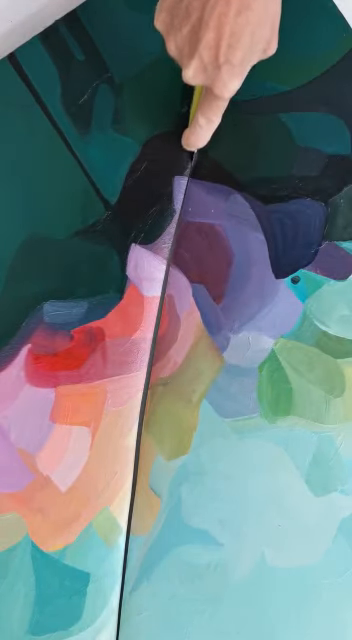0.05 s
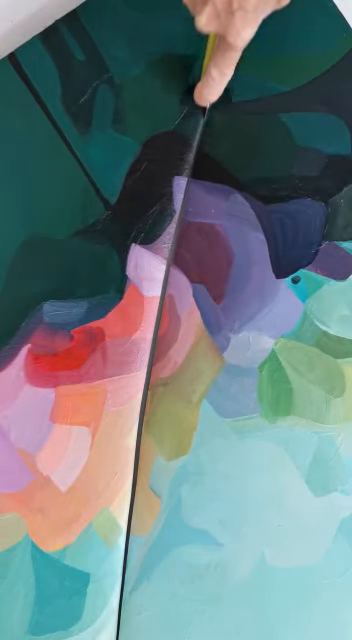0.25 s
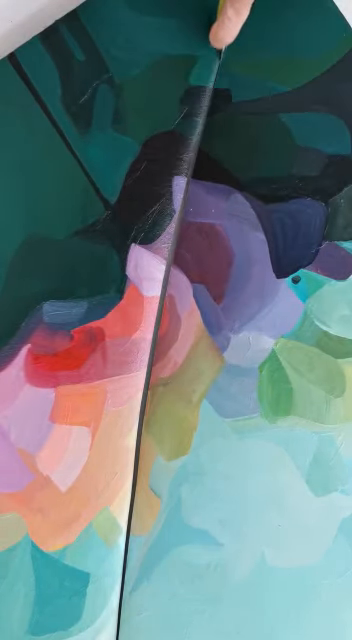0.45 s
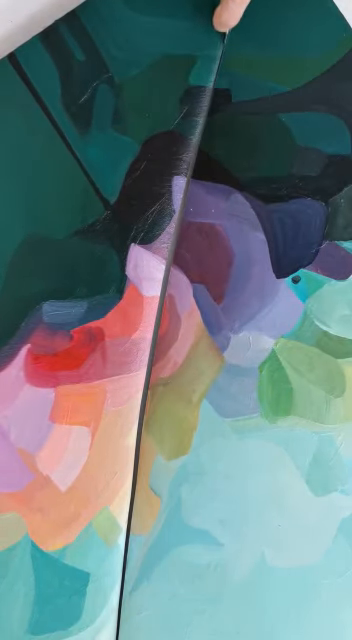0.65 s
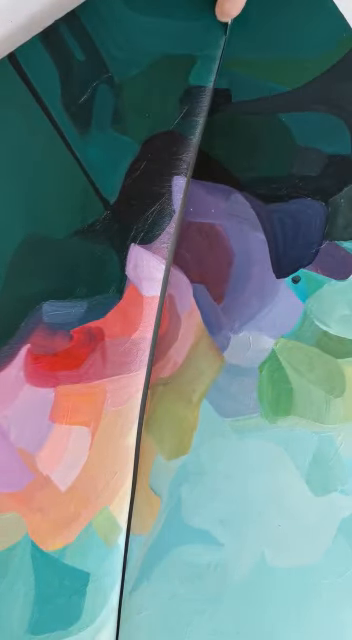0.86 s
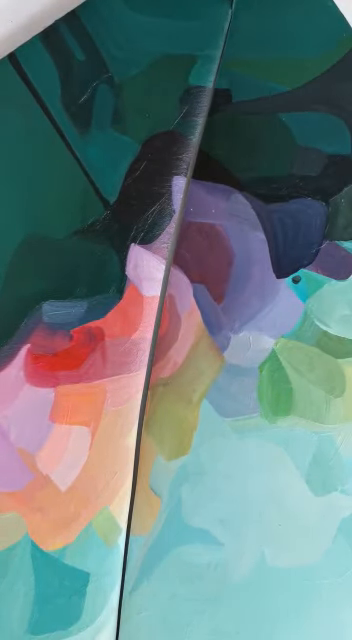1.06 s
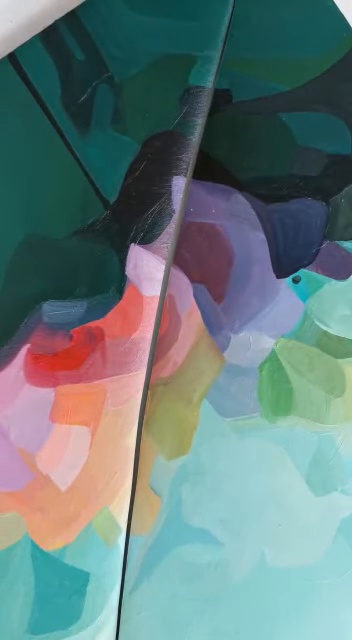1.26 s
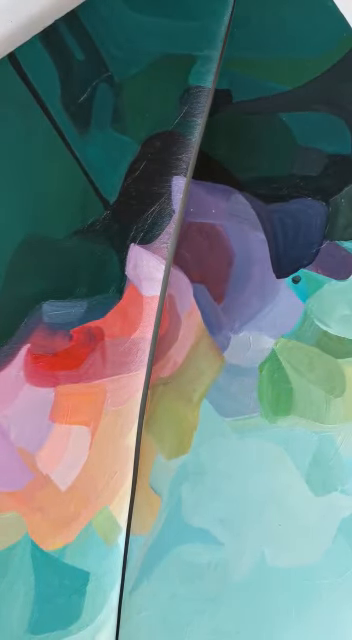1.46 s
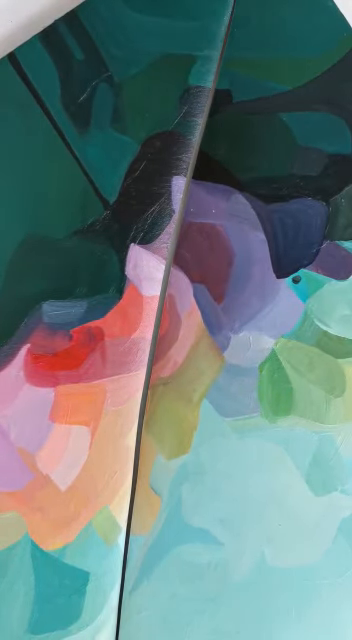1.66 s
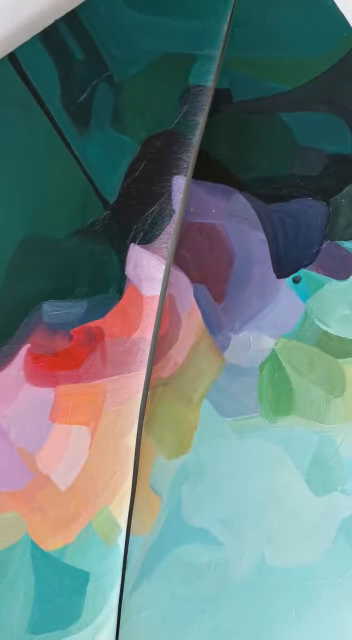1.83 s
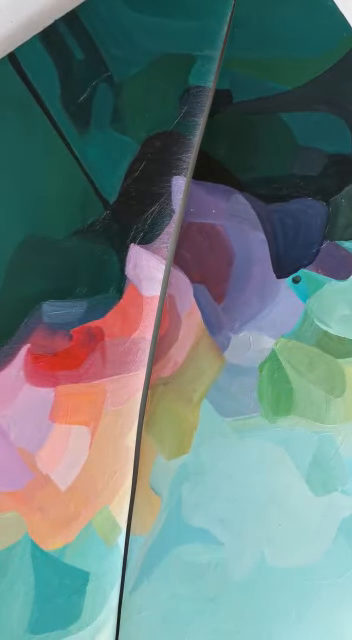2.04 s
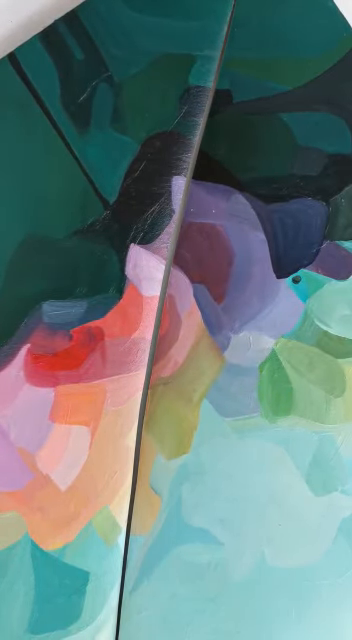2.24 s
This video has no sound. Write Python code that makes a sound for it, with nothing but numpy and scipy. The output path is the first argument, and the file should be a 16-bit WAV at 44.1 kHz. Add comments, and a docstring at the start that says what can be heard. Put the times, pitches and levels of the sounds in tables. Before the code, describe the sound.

A knife rasps through stretched canvas in a quiet, slightly echoing room. The first pull swells from 0.3 to 0.6 seconds, crackling and groaning over drum-like cloth. Threads snag and pop, then a second pull peaks near 1.2 and stops by 1.7. The loose canvas flaps softly. Around 2 seconds the blade rubs, knocks the wooden frame and clicks free. Close handling ticks fall at 1.8 and 2.3.

```python
"""In a quiet, slightly echoing room, a craft knife is pulled twice through a stretched canvas.
A low room hum fades at the start. Each thread that parts plucks the tight cloth like a drum and gives
off a tiny crackle. Tough threads catch and tear, the sticking blade makes the cloth groan, and later
the loose canvas flaps. At the end the blade rubs, knocks against the wooden frame and clicks free,
with two small handling ticks close by."""
import sys
import numpy as np
from scipy import signal
from scipy.fft import rfft, irfft, next_fast_len
from scipy.io import wavfile
from scipy.ndimage import map_coordinates

SR = 44100
rng = np.random.default_rng(int(sys.argv[2]) if len(sys.argv) > 2 else 0)


def wav_out(sig):
    """Save sig, one row per channel (or a flat mono array), as 16-bit PCM at SR to the path in sys.argv[1]."""
    wavfile.write(sys.argv[1], SR, np.round(np.clip(np.atleast_2d(sig).T, -1, 1) * 32767).astype(np.int16))


N = 101429
T = np.arange(N) / SR
M = next_fast_len(N + SR // 2)  # extra samples leave space for ringing
HZ = np.fft.rfftfreq(M, 1 / SR)

# tough threads that catch and tear: start_s, pluck_db, crackle_db
SNAGS = [(0.012, -36.5, -51.5), (0.074, -53, -48.5), (0.602, -29, -52), (0.7658, -33.5, -49),
         (0.7936, -41.5, -51.5), (0.865, -56, -54), (0.9044, -41.5, -54), (0.9233, -48, -49.5),
         (0.9565, -38, -50), (0.991, -38, -52), (1.0396, -35.5, -46.5), (1.057, -44, -50),
         (1.076, -29.5, -75), (1.105, -36, -61), (1.125, -26, -45.5)]


def amp(db):
    """Turn decibels into a gain."""
    return 10 ** (np.asarray(db) / 20)


def unit(x):
    """Scale to an average power of 1."""
    return x / np.sqrt(np.mean(x ** 2) + 1e-20)


def along(points, hz=HZ):
    """Join (pitch_hz, value) points on a log frequency axis."""
    pitches, values = np.transpose(points)
    return np.interp(np.log(hz + 1), np.log(pitches + 1), values)


def curves(rows):
    """One smooth line through time for each column after the first."""
    times, *columns = np.transpose(rows)
    return [np.interp(T, times, column) for column in columns]


def filtered(x, response):
    """Pass x through a filter given as one gain per frequency."""
    return irfft(rfft(x, M) * response, M)[..., :N]


def colour(points):
    """A tone filter through (pitch_hz, level_db) points that keeps the power of white noise."""
    cepstrum = irfft(np.log(unit(amp(along(points)))), M)
    # folded so that the filter rings only after a hit
    cepstrum[1:M // 2] *= 2
    cepstrum[M // 2 + 1:] = 0
    return np.exp(rfft(cepstrum))


def body(modes, low_hz=110, high_hz=1071):
    """An object's fading resonances, weak in deep bass and treble; a tap of 1 peaks at 1."""
    ring = sum(amp(db) * 1j * HZ * width / (hz * hz - HZ * HZ + 1j * HZ * width)
               for hz, width, db in modes)
    low, high = 1j * HZ / low_hz, 1j * HZ / high_hz
    ring = ring * low ** 2 / (1 + low + low ** 2) / (1 + high + high ** 2) ** 2
    return ring / np.abs(irfft(ring, M)).max()


def taps(times, sizes):
    """One-sample taps at the given times."""
    return np.bincount(np.clip(np.asarray(times) * SR, 0, N).astype(int), sizes, N + 1)[:N]


def burst(s, db, decay_s):
    """Noise that starts at time s and dies away."""
    return amp(db) / 2 * (T >= s) * np.exp(-np.abs(T - s) / decay_s) * rng.standard_normal(N)


def swell(s, width_s):
    """A smooth rise and fall around time s."""
    return np.exp(-.5 * ((T - s) / width_s) ** 2)


def panned(x, pan_db):
    """Make the left side pan_db louder than the right."""
    gains = amp(np.array([[.5], [-.5]]) * pan_db)
    return filtered(x, gains / gains.mean(axis=0))


def diffuse(pair):
    """Sound from all around: left and right agree most in the bass."""
    # how alike the sides are: pitch_hz, likeness (1 = the same)
    alike = [(30, 0.22), (130, 1), (300, 0.84), (1300, 0.11)]
    turn = np.arccos(np.clip(along(alike), -1, 1)) / 2
    mid, side = filtered(pair, np.array([np.cos(turn), np.sin(turn)]))
    return np.array([mid + side, mid - side])


def room_tone(level_db=-57, sway_db=4):
    """A faint indoor rumble whose level slowly sways."""
    # tone of the rumble: pitch_hz, level_db
    rumble_tone = [(20, 4.5), (45, -14), (64, 1.5), (130, -13.5), (250, -24), (700, -24), (2000, -33),
                   (16000, -50)]
    sway = map_coordinates(rng.standard_normal(size=40), [T * 6], mode="mirror")
    rumble = filtered(diffuse(rng.standard_normal((2, N))), amp(along(rumble_tone)))
    return amp(level_db + sway_db * sway) * unit(rumble)


def room(x, places=12, walls_decay_s=0.0016, walls_db=3, walls_low_hz=1660, left_lead_s=0.00024):
    """Sound arrives on the left first; near echoes shift as the blade travels, and a tail follows."""
    # time the tail takes to fade by 60 dB: pitch_hz, fade_s
    fade_times = [(350, 0.37), (900, 0.53), (5000, 0.7), (15000, 0.2)]
    # tone of the tail: pitch_hz, level_db
    tail_tone = [(100, -2.5), (400, -7.5), (1000, -7.5), (15000, -1.5)]
    hz, t, noise = signal.stft(rng.standard_normal((2, N)), SR, nperseg=256)
    fading = noise * amp(-60 * t / along(fade_times, hz)[:, None])
    tail = signal.istft(fading, SR, nperseg=256)[1][:, :N] * (T > .004)
    tail = filtered(unit(tail) / np.sqrt(N), amp(along(tail_tone)))
    echoes = 0
    for place in np.eye(places):
        walls = rfft(rng.standard_normal((2, N)) * np.exp(-T / walls_decay_s), M)
        share = np.interp(T, np.linspace(0, T[-1], places), place)
        echoes = echoes + filtered(x * np.sqrt(share), walls / np.abs(walls))
    echoes = filtered(echoes, amp(walls_db) * HZ / np.hypot(HZ, walls_low_hz))
    direct = np.exp(1j * np.pi * HZ * left_lead_s * np.array([[1], [-1]]))
    return filtered(x, direct + rfft(diffuse(tail), M)) + echoes


def hum_and_flaps(rise_s=0.0025):
    """A low room hum fades at the start; later the loose canvas swings with three low thumps."""
    # the hum, then the three thumps: start_s, pitch_hz, level_db, decay_s
    low_tones = [(0.0, 64.6, -47.5, 0.11), (1.43, 143, -46, 0.034), (1.617, 144, -39, 0.019),
                 (1.94, 135.5, -38.5, 0.055)]
    out = 0
    for s, hz, db, decay_s in low_tones:
        age = np.maximum(T - s, 0)
        level = amp(db) * (1 - np.exp(-age / rise_s)) * np.exp(-age / decay_s)
        out = out + level * np.sin(2 * np.pi * hz * age)
    return out


def ticks():
    """Handling makes small, sharp ticks close by."""
    # the ticks: start_s, level_db
    hits = [(1.7954, -22.5), (2.276, -33)]
    # their tone: pitch_hz, level_db
    tick_tone = [(900, -27), (1600, -9.5), (2600, 2), (3500, -8), (15000, -40)]
    return filtered(sum(taps([s], [amp(db)]) for s, db in hits), colour(tick_tone))


def sticking_blade(groan_width_cycles=2.04):
    """The blade grips, so the cloth groans; as it scrapes, the blade itself rings thinly."""
    # cloth groans: peak_s, pitch_hz, level_db
    groans = [(0.292, 437, -29.5), (0.315, 472, -25.5), (0.340, 453, -28), (0.356, 592, -32),
              (0.387, 388, -27), (0.446, 224, -30), (0.536, 220, -32.5), (0.561, 174.6, -37.5)]
    # blade rings: peak_s, half_length_s, pitch_hz, glide_hz_per_s, width_hz, level_db
    rings = [(0.31, 0.08, 2222, 6, 60, -66), (0.37, 0.08, 4875, 4500, 700, -57),
             (0.44, 0.037, 8370, -5.5, 300, -65), (1.41, 0.08, 7290, 1.5, 1000, -56.5)]
    out = sum(amp(db) * swell(s, groan_width_cycles / hz) * np.sin(2 * np.pi * hz * (T - s))
              for s, hz, db in groans)
    for s, width_s, hz, glide, width_hz, db in rings:
        flutter = filtered(rng.standard_normal(N), 1 / (1 + (HZ / width_hz) ** 2))
        tone = np.sin(2 * np.pi * np.cumsum(hz + glide * (T - s)) / SR)
        out = out + amp(db) * swell(s, width_s) * unit(flutter * tone)
    return out


def knife_at_frame():
    """The blade rubs at the end of the slit, knocks the wooden frame and clicks free."""
    # hits on the frame: start_s, knock_db, click_db
    hits = [(1.929, -50, -39.5), (1.937, -35.5, -36), (1.9745, -17.5, -28.5), (2.0055, -28.5, -36),
            (2.0081, -34, -19), (2.0143, -61, -30), (2.023, -57, -31.5), (2.0357, -53, -27)]
    # the frame's resonances: pitch_hz, width_hz, level_db
    wood = [(131, 75, -3.5), (184, 15, -2.5), (414, 470, -7.5), (638, 34, 3.5), (760, 73, -5),
            (1400, 520, -5.5)]
    # loudness of the rubbing: time_s, level_db
    rub_levels = [(1.78, -68.5), (1.83, -58), (1.875, -49.5), (1.9, -55.5), (1.97, -52.5), (1.985, -42),
                  (2.02, -51.5), (2.12, -53.5), (2.25, -92)]
    # tone of the clicks and of the rubbing: pitch_hz, level_db
    click_tone = [(500, -2.5), (3000, -8.5), (7000, -1.5), (10800, -7), (16000, -16.5)]
    rub_tone = [(100, 3), (400, -12), (650, 0.5), (1150, -4.5), (2200, -13.5), (7000, -21.5), (16000, -35)]
    knocks = filtered(sum(taps([s], [amp(db)]) for s, db, _ in hits), body(wood))
    clicks = filtered(sum(burst(s, db, decay_s=0.0016) for s, _, db in hits), colour(click_tone))
    rub = amp(curves(rub_levels)[0]) * unit(filtered(rng.standard_normal(N), colour(rub_tone)))
    return panned(clicks + knocks + rub, pan_db=-2.5)


def cloth_drum(plucks, level, stage, scrape=0.76):
    """Plucks, snags and a steady scrape make the tight cloth ring like a drum."""
    # the cloth's resonances at stages 0, 1 and 2: pitch_hz, width_hz, level_db
    first_pull = [(231, 40, 5.5), (310, 87, 5.5), (424, 82, 7.5), (570, 89, 0), (1110, 240, -8)]
    light_blade = [(187, 150, -5.5), (635, 122, 2), (790, 59, -9.5), (1080, 57, -5.5), (1314, 480, -2.5)]
    second_pull = [(166, 150, 2), (318, 210, -2), (442, 140, 0), (585, 54, 4), (740, 40, -28),
                   (1170, 100, -20)]
    shaking = plucks + scrape * rng.standard_normal(N)
    snags = sum(taps([s], [amp(db)]) for s, db, _ in SNAGS)
    drum = 0
    for k, modes in enumerate([first_pull, light_blade, second_pull]):
        ring = body(modes)
        push = shaking / filtered(shaking, ring).std() * level + snags
        share = np.clip(1 - np.abs(stage - k), 0, 1)
        drum = drum - filtered(push * share, ring)
    return drum


def fibre_crackle(snaps, level, treble_db, stage, decay_s=0.0013, scrape=0.43, treble_hz=6500):
    """Snapping fibres give tiny bursts of noise over a steady scrape; snags tear for longer."""
    # tone of the early and the later crackle: pitch_hz, level_db
    early_tone = [(500, -14), (1300, 8.5), (1650, -1.5), (2000, 10.5), (3300, -2), (4700, 2.5),
                  (6800, -0.5), (10300, -1.5), (13000, -1), (14200, -6)]
    late_tone = [(500, 11), (1300, -6.5), (1650, 0.5), (2000, 7), (3000, 1.5), (4650, 1), (5400, -3),
                 (7000, 0.5), (11000, -2), (13300, -5.5), (16000, -12.5)]
    power = np.abs(filtered(snaps, 1 / (1 + 2j * np.pi * HZ * decay_s)))
    fibres = np.sqrt(power / power.mean() + scrape) * rng.standard_normal(N)
    fibres = unit(fibres * amp(-4 * rng.standard_normal(N)))  # fibres vary in size
    treble = filtered(fibres, HZ ** 4 / (HZ ** 4 + treble_hz ** 4))
    crackle = (fibres + treble * (amp(treble_db) - 1)) * level
    tears = 2 * sum(burst(s, db, decay_s=0.007) for s, _, db in SNAGS)
    later = np.clip(stage, 0, 1)
    early = filtered(crackle * (1 - later) + tears, colour(early_tone))
    return early + filtered(crackle * later, colour(late_tone))


def cut(threads_per_s=420, doubling_db=6.5, scatter_gaps=0.3196, pluck_spread_db=2, snap_spread_db=1):
    """Threads part one by one; a faster blade parts more of them and sounds louder and brighter."""
    # loudness of each pull: time_s, cloth_db, crackle_db
    first_pull = [(0, -51.5, -58), (0.2, -51, -57), (0.28, -41.5, -49), (0.37, -41.5, -49),
                  (0.415, -33.5, -45), (0.51, -31.5, -44), (0.6, -38.5, -50), (0.69, -52, -57),
                  (0.82, -56, -61)]
    second_pull = [(0.888, -48.5, -59.5), (0.982, -53.5, -61.5), (1.06, -49, -55.5), (1.16, -40, -46),
                   (1.236, -31.5, -43), (1.34, -41.5, -48), (1.52, -48, -52), (1.624, -51.5, -53.5),
                   (1.67, -69, -72)]
    # how the cloth's tone moves on: time_s, stage (0 first pull, 1 light blade, 2 second pull)
    stages = [(0.58, 0), (0.74, 1), (1.1, 1.58), (1.25, 2.26), (1.42, 0.84)]
    stage, = curves(stages)
    cloth_db, crackle_db = curves(first_pull + second_pull)
    cutting = np.interp(T, [1.66, 1.74], [1, 0])
    speed_db = crackle_db + 45  # at 0, the blade parts threads_per_s
    rate = threads_per_s * 2 ** (speed_db / doubling_db)
    passed = np.cumsum(rate) / SR
    jitter, pluck_size, snap_size = rng.standard_normal((3000, 3))[:int(passed[-1])].T
    times = np.interp(np.arange(len(jitter)) + scatter_gaps * jitter, passed, T)
    plucks = unit(taps(times, amp(pluck_spread_db * pluck_size)) / np.sqrt(rate))
    snaps = taps(times, amp(snap_spread_db * snap_size) ** 2) / rate
    drum = cloth_drum(plucks, amp(cloth_db) * cutting, stage)
    crackle = fibre_crackle(snaps, amp(crackle_db + 0.5) * cutting, 0.083 * speed_db, stage)
    return drum + crackle


def scene(tick_room_share=0.37):
    """The cut and the knife's exit, heard in the room."""
    # where the canvas is heard: pitch_hz, left_minus_right_db
    canvas_pan = [(130, 1.5), (380, -3.5), (700, -4.5), (1290, 2.5), (2300, -6), (4400, -4)]
    handling = ticks()
    canvas = panned(cut() + sticking_blade(), along(canvas_pan))
    in_room = room(canvas + hum_and_flaps() + knife_at_frame() + tick_room_share * handling)
    return in_room + (1 - tick_room_share) * handling + room_tone()


def record(dry, top_hz=15950):
    """Remove the very highest treble."""
    return filtered(dry, HZ < top_hz)


dry = scene()
out = record(dry)
wav_out(out)
```